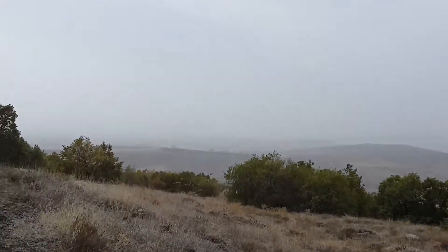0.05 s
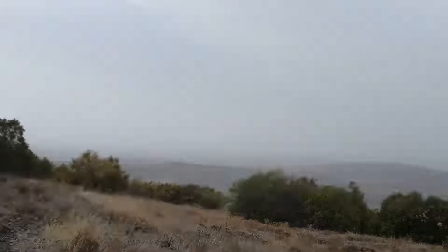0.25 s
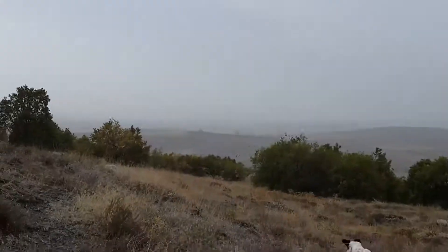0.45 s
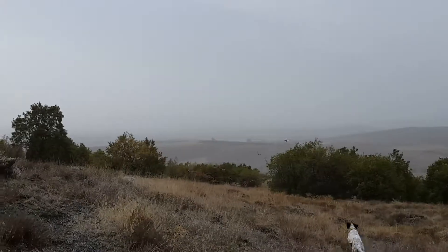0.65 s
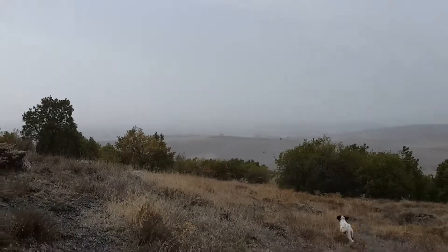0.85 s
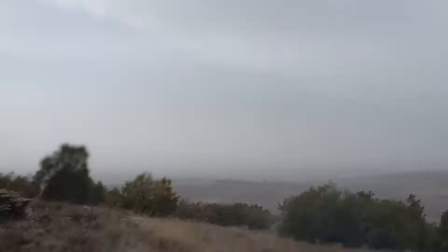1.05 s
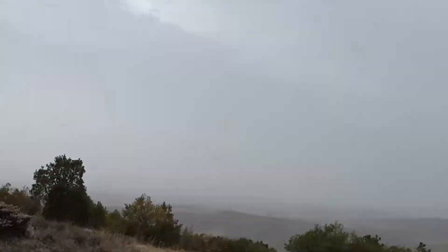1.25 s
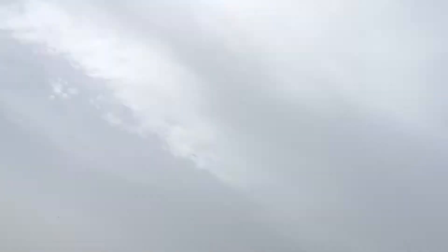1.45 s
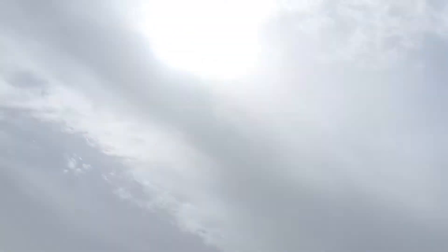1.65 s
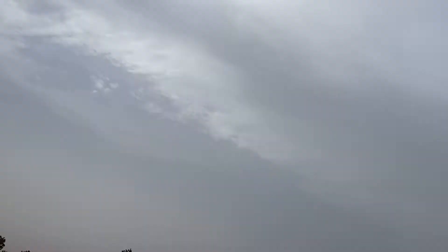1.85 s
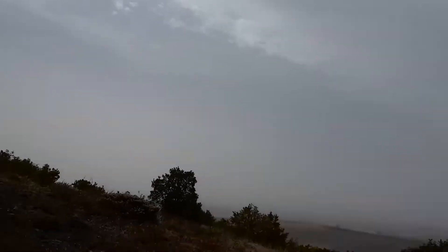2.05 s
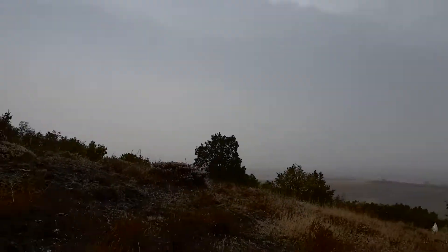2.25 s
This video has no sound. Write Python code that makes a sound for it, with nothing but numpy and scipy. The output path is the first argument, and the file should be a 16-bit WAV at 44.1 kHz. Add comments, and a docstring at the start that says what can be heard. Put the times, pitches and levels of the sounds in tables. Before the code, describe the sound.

Two close shotgun blasts overload the microphone on a windy open hillside, echoes rolling away

```python
"""First, wind rumbles and flutters on two microphone ports and clothing rustles as a shotgun comes up.
Then two shots ring out on an open hillside, close enough to overload the microphone. After each one,
the gun's action clacks, and bushes and slopes send back echoes over a long fading roll.
Nearly every sound is shaped random noise; single wind eddies and small flutters add sharp kicks."""
import sys
import numpy as np
from scipy import signal
from scipy.fft import rfft, irfft, next_fast_len
from scipy.io import wavfile
from scipy.ndimage import uniform_filter1d, map_coordinates

SR = 44100
rng = np.random.default_rng(int(sys.argv[2]) if len(sys.argv) > 2 else 0)


def generate_wav(signal):
    """Clip the signal to [-1, 1] and save it as 16-bit WAV at the path in sys.argv[1]."""
    frames = np.transpose(np.atleast_2d(signal))
    scaled = np.clip(frames, -1, 1) * 32767
    pcm = np.round(scaled).astype(np.int16)
    wavfile.write(sys.argv[1], SR, pcm)


N = 101429
T = np.arange(N) / SR  # time of every sample, s


def amp(db):
    """Turn decibels into a gain."""
    return 10 ** (np.asarray(db) / 20)


def unit(x):
    """Scale to an rms of 1, taken over everything in x."""
    return x / np.sqrt(np.mean(x ** 2) + 1e-20)


def along(points, hz):
    """Read a table of (frequency, value) at any frequency, on a log axis."""
    f, v = np.transpose(points)
    return np.interp(np.log(hz + 1), np.log(f + 1), v)


def curves(rows):
    """Draw straight lines between the rows: one curve for each column after the time."""
    times, *columns = np.transpose(rows)
    return [np.interp(T, times, column) for column in columns]


def wobble(rate):
    """A smooth random curve with this many random points a second."""
    return map_coordinates(rng.standard_normal(2048), [T * rate], mode="wrap")


def two_wobbles(rate):
    """A separate random curve for each port."""
    return np.array([wobble(rate), wobble(rate)])


def filtered(x, response):
    """Change the strength of each frequency in x by the given response."""
    m = next_fast_len(N + 8192)
    spectrum = rfft(x, m) * response(np.fft.rfftfreq(m, 1 / SR))
    return irfft(spectrum, m)[..., :N]


def bell(hz, centre, octaves):
    """A bell-shaped bump around a centre frequency, on an octave scale."""
    return np.exp(-.5 * (np.log2((hz + 1) / centre) / octaves) ** 2)


def swell(s, width):
    """A bell-shaped envelope around time s."""
    return np.exp(-.5 * ((T - s) / width) ** 2)


def colour(points, loss_db_per_khz=0):
    """The gain of a spectrum; a positive loss dulls the treble and a negative one brightens it."""
    return lambda hz: amp(along(points, hz) - loss_db_per_khz * hz / 1000)


def panned(db):
    """Left and right gains that differ by db and keep the total power the same."""
    g = amp(np.array([np.atleast_1d(db), -np.atleast_1d(db)]) / 2)
    return g / np.sqrt(np.mean(g ** 2, axis=0))


def noise(gain):
    """Unrelated noise at each port, shaped by a gain and scaled to rms 1."""
    return unit(filtered(rng.standard_normal((2, N)), gain))


# how alike sound through the air is at the two ports: (frequency [Hz], likeness [0 to 1])
LIKENESS = [(50, 0.57), (250, 0.23), (500, 0.05), (1200, .2), (4000, 0.021), (12000, 0.016)]
# how the ports differ in colour: (frequency [Hz], left minus right [dB])
PORT_COLOUR = [(100, 2), (1000, -2.5), (2700, 1.5), (4200, 4.5), (5600, 3.5), (7000, -13), (9500, -13.5),
               (12000, -7.5), (15000, -3.5)]


def airborne(gain, port_share=1):
    """Noise reaching both ports through the air: more alike in the bass, coloured by each port."""
    def response(hz):
        turn = np.arccos(np.clip(along(LIKENESS, hz), -1, 1)) / 2
        return gain(hz) * np.array([np.cos(turn), np.sin(turn)])
    shared, opposite = noise(response)
    ports = np.array([shared + opposite, shared - opposite])
    return unit(filtered(ports, lambda hz: panned(port_share * along(PORT_COLOUR, hz))))


def patchy(x, depth_db):
    """Scatter: gain that varies at random over about 350 Hz and 23 ms, the same at both ports."""
    z = signal.stft(x, nperseg=512)[2]
    field = rng.standard_normal(z.shape[1:])
    field = uniform_filter1d(field, size=4, axis=0)
    field = uniform_filter1d(field, size=4, axis=1)
    gain = unit(amp(depth_db * unit(field)))
    return signal.istft(z * gain, nperseg=512)[1][:, :N]


# faint background hiss: (frequency [Hz], relative level [dB])
HISS_COLOUR = [(100, -13), (500, -6.5), (1500, -0.5), (5000, -5), (6500, -14), (10000, -13.5), (15000, -18)]
HISS_DB = -62.5  # before a slow random wavering


def hiss():
    """Faint steady background hiss: shaped noise whose level wavers a little."""
    return amp(HISS_DB + 1.2 * wobble(14)) * airborne(colour(HISS_COLOUR))


# rumble before, between and after the shots, one list per stretch:
# (time [s], level before the layer gains below [dB], left minus right [dB])
RUMBLE = [
    [(0.0, -28, 1.5), (0.03, -39.5, 5), (0.08, -36, 18), (0.134, -28, -2), (0.172, -30.5, 15),
     (0.204, -25.5, 6), (0.266, -28, 5), (0.288, -35.5, -1)],
    [(0.37, -32, -4), (0.616, -41.5, 9), (0.65, -37.5, -7), (0.848, -33, 8), (0.892, -36.5, 3),
     (0.998, -32.5, 13), (1.038, -33, 3.5), (1.123, -41.5, -3)],
    [(1.2, -30, -7), (1.31, -35, 13), (1.356, -32, 2.5), (1.544, -54, -11), (1.616, -57.5, -12),
     (1.632, -43, -17), (1.662, -40, -15), (1.72, -48, 0)],
    [(1.73, -47, 11), (1.75, -32.5, 22), (1.792, -33, 0), (1.896, -40, 7), (1.942, -36.5, -4),
     (1.984, -35.5, 33), (2.044, -44, -1.5), (2.3, -39, 3)],
]
# flutter in the gusts, one list per gust:
# (time [s], level before the layer gain below [dB], left minus right [dB])
FLUTTER = [
    [(0.0, -66, -1), (0.194, -45.5, 1.5), (0.28, -65, 1.5)],
    [(0.56, -46, 18), (0.606, -37, 25), (0.634, -66, -17), (0.668, -39, 2), (0.722, -33.5, -2),
     (0.756, -44, 10), (0.852, -31.5, 36), (0.875, -46, -5)],
    [(0.945, -43, 12.5), (0.974, -29, 41), (1.005, -30.5, 41), (1.055, -36.5, 15), (1.086, -28, 34),
     (1.11, -58.5, 11.5)],
    [(1.42, -77.5, -7), (1.72, -61, -3), (1.79, -47, 1.5), (1.87, -47.5, 5), (1.915, -43.5, -1.5),
     (1.98, -41, 33), (2.03, -57.5, 4.5), (2.3, -64, 6.5)],
]
# deep rumble, the fuller body above it, and flutter: each (frequency [Hz], relative level [dB])
RUMBLE_COLOUR = [(20, -33.5), (45, -14.5), (70, 0.5), (135, 5), (200, 1), (300, -25), (500, -45.5),
                 (1200, -81)]
BODY_COLOUR = [(80, -27), (160, 0), (250, 5), (380, -11), (600, -35.5), (1200, -65)]
FLUTTER_COLOUR = [(80, -16), (220, 2.5), (420, -2.5), (700, -10), (1000, -17.5), (1500, -36.5), (3000, -63)]
RUMBLE_GAIN_DB, BODY_GAIN_DB, FLUTTER_GAIN_DB = 1.5, -2.5, 5  # added to the levels in the tables
RUMBLE_LUMP_DB = 3.8  # depth of the random lumps
KICKS_PER_S, KICK_SPREAD_DB = 150, 1.5  # middle value of a varying rate; spread of strength
CHURN_PER_S, CHURN_LUMP_DB = 110, 2.5  # speed and depth of the ragged air


def flutter_noise():
    """Small irregular kicks of either sign over ragged churning air, separate at each port."""
    rate = KICKS_PER_S * np.exp(two_wobbles(KICKS_PER_S))
    kick_count = np.floor(np.cumsum(rate, axis=1) / SR)
    signs = rng.choice([-1, 1], (2, N))
    strengths = amp(KICK_SPREAD_DB * rng.standard_normal((2, N)))
    kicks = np.diff(kick_count, prepend=0) * signs * strengths
    churn = noise(colour(FLUTTER_COLOUR)) * amp(CHURN_LUMP_DB * two_wobbles(CHURN_PER_S))
    return unit(unit(filtered(kicks, colour(FLUTTER_COLOUR))) + unit(churn))


def wind():
    """Turbulence at each port: two lumpy rumbles that rise and fall together, and a flutter in the gusts."""
    db, pan = curves(np.vstack(RUMBLE))
    flutter_db, flutter_pan = curves(np.vstack(FLUTTER))

    def rumble(gain_db, spectrum, lumps_per_s):
        lumps = amp(RUMBLE_LUMP_DB * two_wobbles(lumps_per_s))
        return amp(db + gain_db) * panned(pan) * unit(lumps * noise(colour(spectrum)))
    deep = rumble(RUMBLE_GAIN_DB, RUMBLE_COLOUR, lumps_per_s=32)
    body = rumble(BODY_GAIN_DB, BODY_COLOUR, lumps_per_s=72)
    flutter = amp(flutter_db + FLUTTER_GAIN_DB) * panned(flutter_pan) * flutter_noise()
    return deep + body + flutter


# single eddies that hit a port:
# (time [s], relative level [dB], centre [Hz], width [s], left minus right [dB])
EDDIES = [(.074, -40, 654, .002, -1), (0.126, -21.5, 196, 0.0033, -4.5), (0.205, -13.5, 220, 0.0048, 35),
          (.235, -16.5, 224, 0.0033, 24), (.266, -26.5, 233, 0.0026, -2), (0.598, -25, 400, 0.0014, 28.5),
          (0.675, -23, 427, 0.0016, 22), (0.736, -21, 456, 0.0013, 17), (0.765, -21, 397, 0.001, 24),
          (0.777, -21.5, 398, 0.00063, 18), (0.81, -22.5, 310, 0.0019, 19), (.84, -21.5, 275, 0.0037, 24),
          (0.853, -26, 346, 0.0032, 25), (0.889, -27, 300, 0.0017, -12), (0.923, -22, 373, 0.0035, 22),
          (0.996, -15.5, 428, 0.00091, 41), (1.007, -19.5, 433, 0.0013, 32), (1.015, -18, 303, 0.0025, 40),
          (1.255, -15.5, 397, 0.0031, 19), (1.636, -38.5, 202.5, 0.0073, -8),
          (1.757, -26.5, 281, 0.0015, 9), (1.782, -28, 334, 0.0017, -14), (1.803, -31.5, 367, 0.0022, -19),
          (1.885, -29.5, 397, 0.00082, -19), (1.916, -28.5, 298, 0.0098, 9),
          (1.948, -27.5, 390, 0.0014, 15), (1.974, -24, 314, 0.0019, 25), (2.017, -30, 271, 0.0021, 17),
          (2.065, -31, 161, 0.0048, -5.5), (2.104, -23, 230, 0.0017, 23), (2.18, -30, 196, 0.004, -3.5),
          (2.276, -28, 130, .009, 10)]
EDDY_OCTAVES = 0.62  # width of the bell around the centre frequency
EDDY_KICK_S = 0.0014  # in eddies shorter than this the kick outweighs its puff


def eddies():
    """A strong eddy is one pressure kick inside a short low puff, often stronger on one port."""
    def even(x):  # same energy at each port
        return x / np.linalg.norm(x, axis=-1, keepdims=True)
    out = np.zeros((2, N))
    for s, db, centre, width, pan in EDDIES:
        band = lambda hz: bell(hz, centre, EDDY_OCTAVES)
        shape = swell(s, width)
        kick = filtered(signal.unit_impulse(N, round(s * SR)), lambda hz: 1j * band(hz))
        puff = shape * noise(band)
        eddy = even(np.sqrt(EDDY_KICK_S / width) * even(kick) + even(puff))
        out += amp(db) * panned(pan) * eddy * np.linalg.norm(shape)  # longer eddies carry more energy
    return out


# bright noise, before a random wavering: rustling cloth before the first shot,
# then faint hiss that rises late: (time [s], level [dB])
BRIGHT_NOISE = [(0, -47.5), (.07, -45), (.15, -41), (.2, -42), (.265, -41.5), (.29, -69.5), (.5, -78.5),
                (2.0, -75.5), (2.3, -63.5)]
# swishes and ticks of cloth and grass: (time [s], level [dB], width [s])
SWISHES = [(.09, -35.5, 0.0024), (.129, -36, 0.0029), (0.686, -54.5, .01), (0.863, -48, 0.0012),
           (0.869, -52, 0.001), (0.974, -49.5, 0.00097), (0.981, -51, .001), (1.021, -52, 0.00093),
           (1.803, -57.5, 0.0016), (1.977, -57, 0.0015), (2.148, -58.5, 0.0044)]
# colour of both: (frequency [Hz], relative level [dB])
CLOTH_COLOUR = [(600, -18.5), (1200, -4), (3000, -5.5), (5000, 1), (6500, -6), (8300, 1.5), (10000, -4.5),
                (15000, -4)]


def clothing():
    """Bright noise: cloth rubs as the gun comes up, then faint hiss; brief swishes and ticks on top."""
    db, = curves(BRIGHT_NOISE)
    steady = amp(db + 1.1 * wobble(190))
    swishes = sum(amp(level) * swell(s, width) for s, level, width in SWISHES)
    return (steady + swishes) * airborne(colour(CLOTH_COLOUR))


def rebound(s, width):
    """An echo swells up to time s and trails away."""
    u = np.abs(T - s) / width
    tail = np.exp(1 - np.sqrt(1 + (u / 1.15) ** 2))  # late on, it dies over 1.15 widths
    return np.where(T < s, swell(s, width), tail)


# echoes; the gun swings between the shots, so each shot has its own levels, before random scatter:
# (delay [s], width [s], level after first shot [dB], level after second shot [dB], treble loss [dB per kHz])
ECHOES = [(.032, .003, -13, -9.5, 1.2), (.056, .005, -20, -20, -3.5), (.072, .004, -31, -18, -1.5),
          (.112, 0.008, -25, -29.5, -0.1), (.15, 0.016, -23, -28.5, 0), (.2, .014, -22, -24.5, 1),
          (0.241, 0.0071, -28.5, -25, 3.5), (.32, 0.04, -48, -51.5, 1.5), (.48, 0.023, -49.5, -48.5, 3.5),
          (.597, 0.022, -59, -49, 0.97), (.72, 0.022, -55, -54, 7)]
# colour of the echoes before treble and ground losses: (frequency [Hz], relative level [dB])
ECHO_COLOUR = [(60, -14), (250, 9), (700, -0.5), (1500, 3), (3000, 1), (5000, 3), (6500, -4), (9500, -4),
               (12000, -12.5), (15000, -20)]
# soft ground swallows the low mids of far echoes; the loss is per second of delay
GROUND_HZ, GROUND_WIDTH_OCTAVES, GROUND_DB_PER_S = 365, .9, 23.5
ROLL_DB, ROLL_FALL_DB_PER_S, ROLL_LOSS_DB_PER_KHZ = -36.5, 40, 1.6  # start level, fade, treble loss
ECHO_PATCH_DB = 2  # depth of the scatter


def echoes():
    """Bushes and slopes answer each shot at the same delays, over a long fading roll."""
    def distant(delay, loss):
        def gain(hz):
            ground = bell(hz, GROUND_HZ, GROUND_WIDTH_OCTAVES)
            return colour(ECHO_COLOUR, loss)(hz) * amp(-GROUND_DB_PER_S * delay * ground)
        return airborne(gain)
    out = np.zeros((2, N))
    for delay, width, *levels, loss in ECHOES:
        envelope = sum(amp(db) * rebound(s + delay, width) * (T > s)
                       for (s, _), db in zip(SHOTS, levels))
        out += envelope * distant(delay, loss)
    roll = sum((T > s) * amp(ROLL_DB - ROLL_FALL_DB_PER_S * np.abs(T - s)) for s, _ in SHOTS)
    out += roll * distant(delay=.5, loss=ROLL_LOSS_DB_PER_KHZ)
    return patchy(out, ECHO_PATCH_DB) * amp(1.7 * wobble(170))


# clacks of the gun's action: (time [s], level [dB])
CLACKS = [(.3755, -4), (0.3789, -12), (0.3901, -11), (1.2248, -7.5)]
# colour of the steel: (frequency [Hz], relative level [dB])
CLACK_COLOUR = [(500, -11), (3000, -25), (4900, 22.5), (6500, 3.5), (15000, -28)]
CLACK_DECAY_S = .0011


def action():
    """Short steel clacks as the gun reloads: sudden noise that dies within milliseconds."""
    envelope = sum((T > s) * amp(db) * np.exp(-np.abs(T - s) / CLACK_DECAY_S) for s, db in CLACKS)
    return envelope * airborne(colour(CLACK_COLOUR))


# the shots, with the level of the crash before overload: (time [s], level [dB])
SHOTS = [(0.2943, -3.5), (1.130, -6.5)]
# colour of the crash: (frequency [Hz], relative level [dB])
BLAST_COLOUR = [(30, -27), (70, -16), (150, -5), (400, -7), (650, -9), (1000, -6.5), (1500, -6),
                (2200, -7.5), (4000, -5), (5000, -5.5), (6000, -11), (8500, -8), (15000, -15)]
# resonances in the blast: (frequency [Hz], width [Hz], relative level [dB])
RESONANCES = [(402.6, 11, 3), (3944, 27, 3), (4700, 90, 4.5), (5230, 60, -2.5)]
ATTACK_S, HOLD_S, FALL_DB_PER_S = .001, .018, 248  # the whole blast rises, holds, then falls
RING_DB, RING_EXTRA_FALL_DB_PER_S = -5, 219.5  # on top of the blast's own fall
THUMP_DB, THUMP_HZ, THUMP_OCTAVES, THUMP_RISE_S = -10, 380, 0.63, 0.042
CRACKLE_DB, CRACKLE_PER_S = 2, 900  # depth and speed of the crackle
BLAST_PATCH_DB = 2.3  # depth of the scatter
BLAST_PORT_SHARE = 0.47  # overload evens out the colours of the two ports


def blasts():
    """Each shot is a crackling crash that holds briefly and dies, with a ring and a hollow thump inside."""
    def resonance(f):
        return sum(amp(db) * 1j * f * w / (c * c - f * f + 1j * f * w) for c, w, db in RESONANCES)
    out = np.zeros((2, N))
    for s, db in SHOTS:
        age = T - s
        fall_db = FALL_DB_PER_S * np.maximum(age - HOLD_S, 0)
        envelope = np.clip(age / ATTACK_S, 0, 1) * amp(db - fall_db)
        crackle = unit(amp(CRACKLE_DB * wobble(CRACKLE_PER_S)))
        crash = patchy(airborne(colour(BLAST_COLOUR), BLAST_PORT_SHARE), BLAST_PATCH_DB) * crackle
        ring = amp(RING_DB - RING_EXTRA_FALL_DB_PER_S * np.abs(age)) * airborne(resonance)
        thump = amp(THUMP_DB) * airborne(lambda hz: bell(hz, THUMP_HZ, THUMP_OCTAVES))
        thump_rise = np.clip(age / THUMP_RISE_S, 0, 1)
        out += envelope * (crash + ring + thump * thump_rise)
    return out


def scene():
    """Everything together, from the faint background hiss to the shots."""
    return hiss() + wind() + eddies() + clothing() + echoes() + action() + blasts()


CLIP_TOP = 1.0  # loudest level the microphone can give
TOP_HZ, EDGE_HZ = 15500, 120  # upper band limit and how gradually it cuts


def record(dry):
    """The microphone overloads smoothly on loud peaks, then the treble is cut at the band limit."""
    clipped = dry / (1 + np.abs(dry / CLIP_TOP) ** 4) ** (1 / 4)
    return filtered(clipped, lambda hz: .5 - .5 * np.tanh((hz - TOP_HZ) / EDGE_HZ))


dry = scene()
out = record(dry)
generate_wav(out)
```